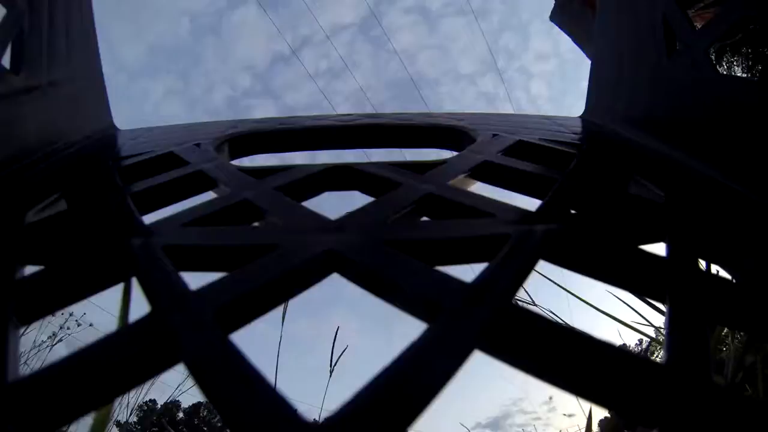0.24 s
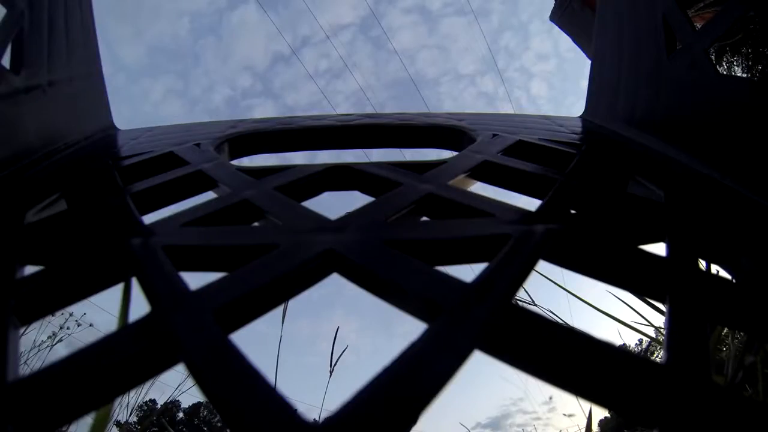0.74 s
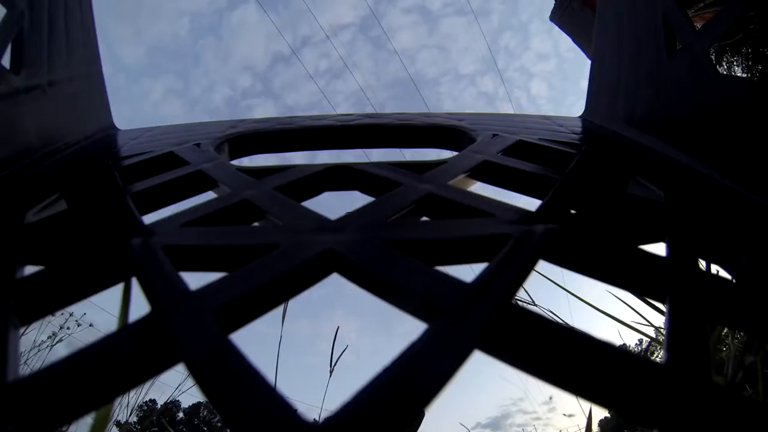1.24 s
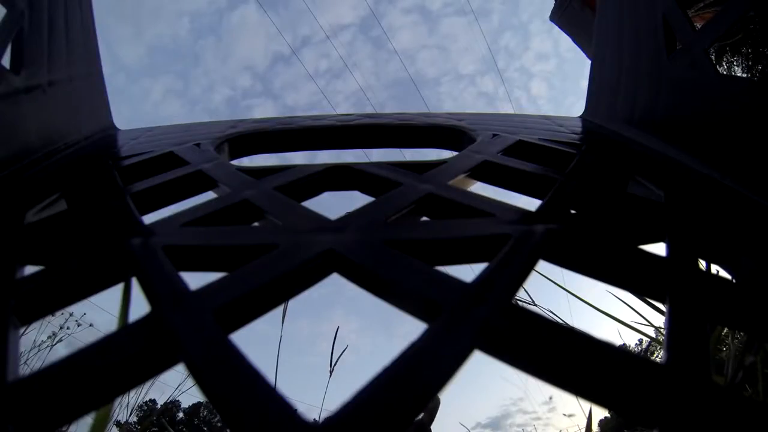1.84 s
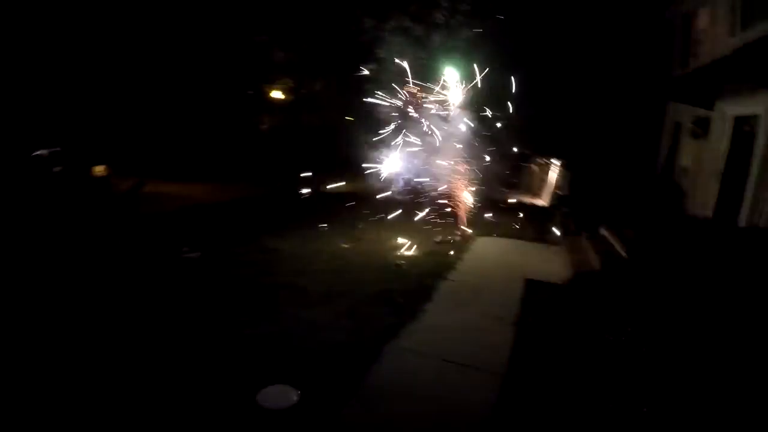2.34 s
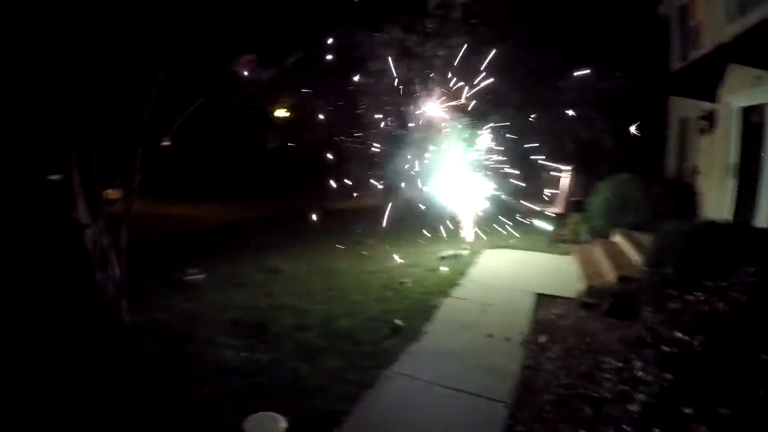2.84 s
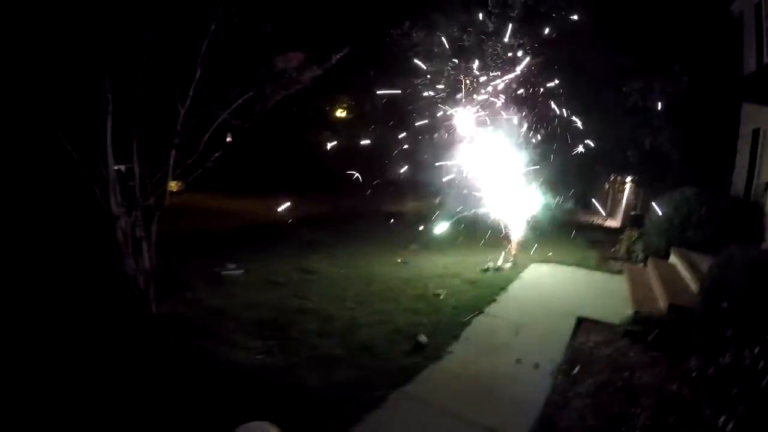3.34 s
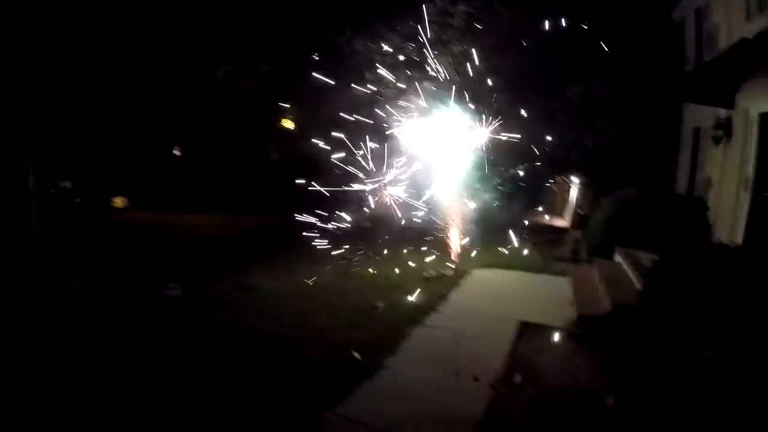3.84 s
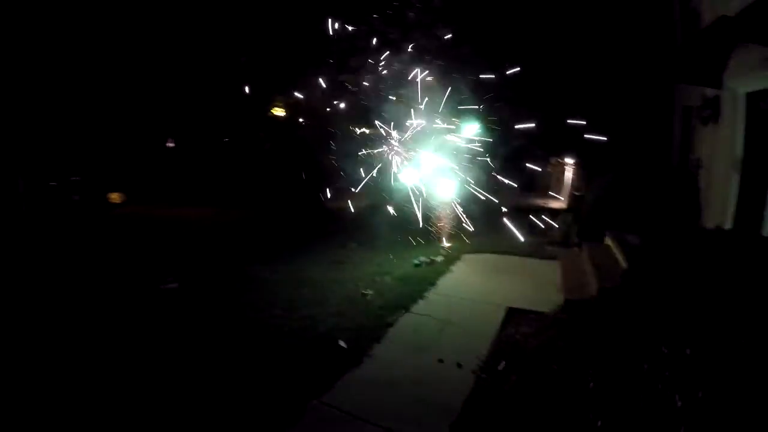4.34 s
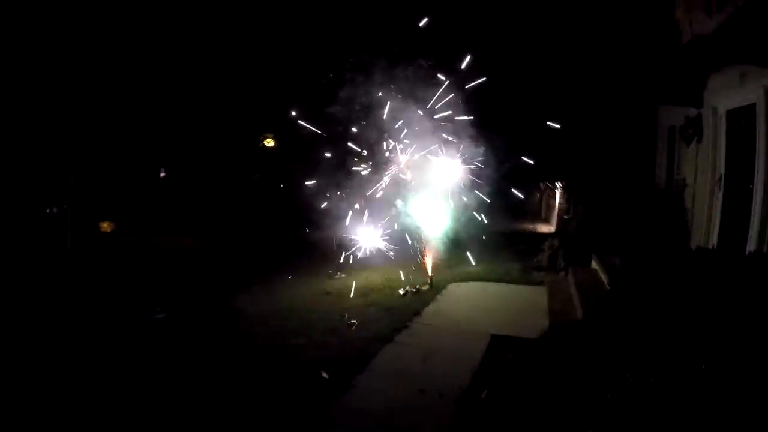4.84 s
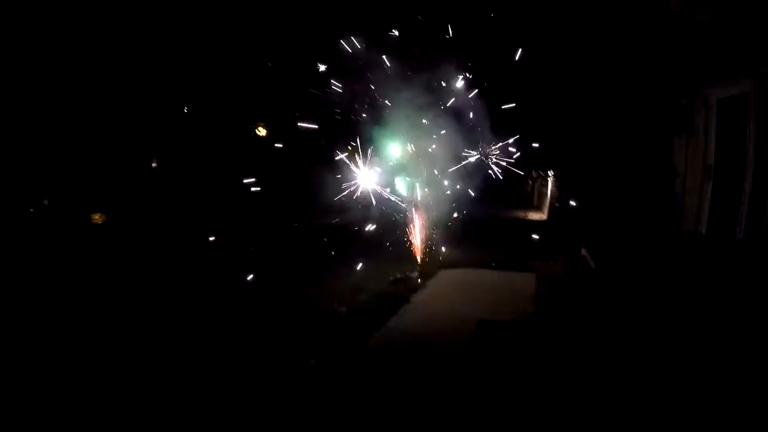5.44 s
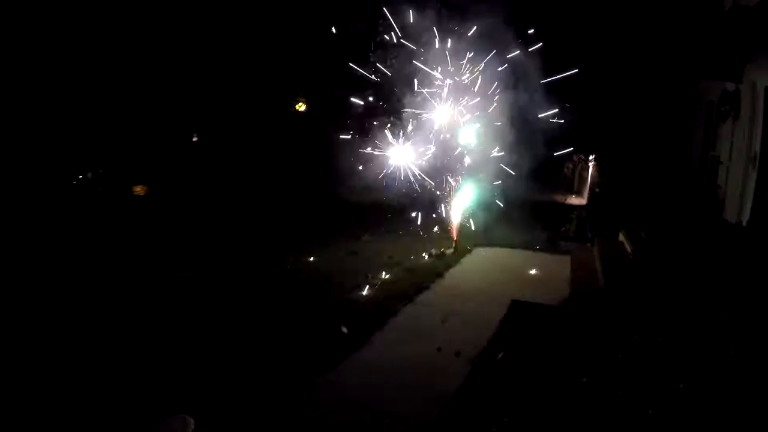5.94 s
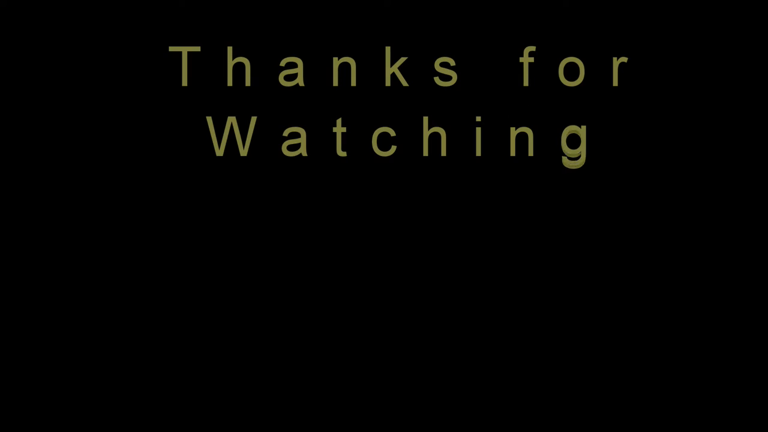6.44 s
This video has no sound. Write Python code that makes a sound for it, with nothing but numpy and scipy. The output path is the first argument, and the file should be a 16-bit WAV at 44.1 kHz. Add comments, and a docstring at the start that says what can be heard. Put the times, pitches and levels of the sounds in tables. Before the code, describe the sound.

Short indoor room tone, a hushed outdoor pause with one faint tick, then rapid sharp firework pops over gritty hiss, abruptly cut to silence.

```python
"""Ground fountain firework at night

A moment of garage air, then a hushed dusk outdoors, then a fountain on a lawn, cut short while still burning.
Room and dusk air are band-shaped noise; the dusk adds insect bands, a tick and a pulsing camera whine.
The stars are pressure spikes in quick clusters, reflected by the path and the house front, over a jet of
noise and sparks, all ringing in a small camera's housing. Low noise gives a breeze, the first bang's boom
and later puffs of air on the microphone.
"""
import sys
import numpy as np
from scipy import signal
from scipy.io import wavfile
from scipy.ndimage import uniform_filter1d

SR = 44100
rng = np.random.default_rng(int(sys.argv[2]) if len(sys.argv) > 2 else 0)


def transcribe(u):
    """Save the signal u as a 16-bit wav file named by the first command-line argument.

    u: samples, shape (n,) or (channels, n), limited to [-1, 1]; the rate is SR.
    q: integer samples, one column per channel.
    """
    v = np.clip(np.atleast_2d(u).T, -1, 1)
    q = np.round(v * 32767).astype(np.int16)
    wavfile.write(sys.argv[1], SR, q)


N = 294611
TIME = np.arange(N) / SR  # seconds

# The three successive places. Each: start in seconds, end in seconds.
GARAGE_SPAN = (0, .269)
DUSK_SPAN = (.288, 1.932)
NIGHT_SPAN = (1.981, 6.150)

# Spectrum of garage air. Each row: frequency in Hz, relative density in dB per Hz.
GARAGE_SPECTRUM = [(25, -1.5), (60, -9), (135, 2), (175, -19), (230, -3.5), (550, -12), (830, -4),
                   (1100, -12), (1400, -12.5), (2100, -18), (3400, -29.5), (10000, -36.5), (15000, -37)]
# Spectrum of dusk air. Each row: frequency in Hz, relative density in dB per Hz.
DUSK_SPECTRUM = [(15, -33), (25, 3.5), (71, 0), (139, -3.5), (243, -8), (729, -17.5), (790, -18),
                 (2300, -27), (2700, -26), (3930, -31.5), (5010, -31), (7480, -40), (12100, -42),
                 (13800, -40), (15000, -43)]
# Faint shrill bands, as of far insects. Each row: centre in Hz, width in Hz, rms level in dB.
INSECT_BANDS = [(2680, 450, -76), (4980, 250, -84)]
# Thin electronic camera whine. Each row: frequency in Hz, amplitude before pulsing in dB, rms wavering in Hz.
WHINE_TONES = [(5730, -85, 8), (11290, -81, 10)]
# Low swells: the first bang's boom, then puffs of air on the microphone.
# Each row: start in seconds, time from start to release in seconds, level in dB.
LOW_SWELLS = [(2.0, .05, -41), (4.235, .17, -33.5), (5.28, 0.073, -38.5), (5.64, .04, -34.5),
              (5.84, .08, -39)]
# Spectrum of the fountain's jet. Each row: frequency in Hz, relative density in dB per Hz.
JET_SPECTRUM = [(30, 1.5), (80, 3.5), (160, -12.5), (400, -1.5), (800, -17), (2000, -12), (5000, -9.5),
                (15000, -9)]
# Loud bursting stars. Each row: time in seconds, relative level in dB, crack over body in dB.
LOUD_STARS = [(1.993, 0, -5), (2.0435, -4, -4), (2.054, -14, -1), (2.073, -7.5, -6.5), (2.1209, -11, -3),
              (2.1376, -7.5, -7.5), (2.1915, -13, -1), (2.2098, -7, -4), (2.3041, -8, -4.5),
              (2.3293, -13, -5), (2.3855, -11, -2.5), (2.404, -13, -5.5), (2.4507, -6.5, -2.5),
              (2.5129, -13.5, -0.5), (2.5258, -7.5, -4), (2.5503, -8, -4), (2.596, -7, -1),
              (2.641, -9, -3.5), (2.661, -14.5, -1.5), (2.69, -13, 3), (2.7118, -18, -15.5),
              (2.7332, -6, -7), (2.758, -19, -10.5), (2.798, -16.5, -3), (2.818, -17.5, -13),
              (2.8356, -11.5, -5.5), (2.8441, -16, -6), (2.9033, -14, -4), (2.939, -6.5, -4),
              (2.975, -13.5, -7), (3.066, -14, -7), (3.071, -11.5, -5), (3.1059, -8, -6), (3.132, -7, -3.5),
              (3.1495, -13.5, -8.5), (3.1738, -14.5, -3.5), (3.1992, -12.5, -8), (3.2124, -11, -6),
              (3.2367, -8, -4), (3.2557, -11, -8), (3.2966, -12.5, -1), (3.3129, -12.5, -5.5),
              (3.323, -9, 0), (3.348, -16, -4), (3.376, -11, -8.5), (3.413, -6.5, -3.5),
              (3.4358, -11.5, -4), (3.4547, -11.5, -5), (3.555, -11.5, -3.5), (3.5868, -8.5, -7),
              (3.606, -7, -3.5), (3.623, -12, -1.5), (3.637, -12, -2), (3.657, -13.5, -4.5),
              (3.6652, -11, -4), (3.6829, -12.5, -4), (3.706, -11.5, -4.5), (3.7553, -9.5, -3),
              (3.8043, -11, -2), (3.8112, -11, -2), (3.854, -16, 0), (3.863, -10, -2), (3.8712, -6.5, -4.5),
              (3.9237, -9, -2.5), (3.979, -23, -10), (4.005, -7.5, -2.5), (4.069, -17.5, 1),
              (4.0807, -16.5, -12.5), (4.0983, -16, -1), (4.172, -9, -7.5), (4.2153, -7, -4),
              (4.2307, -7.5, -2), (4.268, -16, -6), (4.2885, -13.5, -6), (4.316, -10, -3), (4.336, -15, -3),
              (4.3467, -10.5, 0.5), (4.3786, -15.5, -8), (4.3961, -14.5, -10.5), (4.4574, -15, -1),
              (4.4753, -17.5, -4.5), (4.5225, -16, -5.5), (4.5622, -17, -2), (4.5734, -10, -3),
              (4.584, -8, -4.5), (4.6531, -17, -8), (4.6646, -11, -7), (4.7447, -11, -8), (4.7567, -8, 0),
              (4.7934, -12, -2), (4.822, -12, -7), (4.8346, -7, 0), (4.8688, -9, -0.5), (4.9295, -10, -6),
              (4.9361, -11, 0), (4.9675, -12, -2.5), (5.0054, -11, -1), (5.0252, -13, -9),
              (5.036, -14, 5.5), (5.0753, -18, 0), (5.1581, -10, -2.5), (5.1692, -9, 0.5),
              (5.2109, -9.5, -2), (5.246, -11.5, 0), (5.2692, -13.5, -3), (5.288, -16.5, -7),
              (5.322, -24.5, -8), (5.339, -13, -5.5), (5.3485, -13, -3), (5.3592, -8.5, 0.5),
              (5.4238, -8, -3), (5.5192, -14, -4.5), (5.5633, -16, -7), (5.5784, -9, -3),
              (5.6027, -11.5, -1), (5.629, -21, -3), (5.6676, -10, -8.5), (5.7077, -15.5, -3),
              (5.7538, -11, -1), (5.762, -8, 1), (5.8395, -8, -2), (5.8602, -10, .5), (5.8796, -13, -1.5),
              (5.893, -10.5, -3), (5.922, -6, -4), (5.9589, -6.5, -2), (6.0206, -7.5, -2.5),
              (6.0544, -8.5, -3.5), (6.1243, -21.5, -17)]
# Resonances and hollows of the camera housing. Each row: centre in Hz, width in Hz, gain in dB.
HOUSING_MODES = [(84, 14, 5.5), (118, 22, -3), (260, 97, 4.5), (440, 160, -3.5), (777, 557, 12.5),
                 (1244, 210, 5.5), (1650, 1300, -6), (2660, 2000, 4.5), (4180, 260, 4), (5000, 650, 3.5),
                 (5690, 520, 5), (7430, 2000, 4)]

GARAGE_DB, DUSK_DB = -41.5, -53.5  # rms of the air noise
FRAMES_PER_S = 30  # pictures the camera takes, which pulse its whine
SWELL_ATTACK_S, SWELL_RELEASE_S, BREEZE_DB = .02, .045, -51.5

# Loud stars closer than the gap form one volley, and a weaker star may go off between them
VOLLEY_GAP_S, WEAK_SHARE = .031, .65
# A weak star lies below the mean of its two neighbours
WEAK_DROP_DB = 7.5
# Crack over body of weak stars and stragglers; the spread applies to their level and their crack
WEAK_CRACK_DB, WEAK_SPREAD_DB = -3.5, 2
# Outside a volley a faint straggler may trail a star: chance, mean delay, level below the star
STRAGGLER_SHARE, STRAGGLER_S, STRAGGLER_DROP_DB = .3, .022, 9.5

# Star heights at the start of the night; the whole range climbs as the fountain burns on
LOWEST_STAR_M, HIGHEST_STAR_M, CLIMB_M_PER_S = 0.97, 2.05, .11
MIC_HEIGHT_M, DISTANCE_M, SOUND_M_PER_S = 1.5, 6, 343
# The boom follows a star's dull body and weakens as the fountain burns on
BOOM_DB_PER_CRACK_DB, BOOM_FADE_DB_PER_S = 0.5, 0.7
CUTOFF_HZ = 15350


def from_db(db):
    """The decibel law: level to amplitude gain."""
    return 10 ** (np.asarray(db) / 20)


def rms_one(x):
    """Normalization to unit mean power."""
    return x / np.sqrt(np.mean(x ** 2) + 1e-20)


def butter(x, hz, kind, order=2):
    """Causal filtering with a maximally flat (Butterworth) passband."""
    edges_hz = np.clip(hz, 10, .45 * SR)
    return signal.sosfilt(signal.butter(order, edges_hz, kind, fs=SR, output="sos"), x)


def during(span):
    """Gating: one inside a span, zero outside, with 64-sample ramps."""
    return uniform_filter1d(1.0 * ((TIME >= span[0]) & (TIME < span[1])), size=64)


def coloured_noise(spectrum):
    """Spectral shaping: third-octave bands of white noise weighted by a density curve; rms 1."""
    hz, level_db = np.transpose(spectrum)
    edges = 20 * 2 ** (np.arange(30) / 3)
    white = rng.standard_normal((2, N))
    out = 0
    for k, (low, high) in enumerate(zip(edges, edges[1:])):
        log_centre = np.log(low * high) / 2
        gain = from_db(np.interp(log_centre, np.log(hz), level_db))
        # neighbouring bands take independent noise
        out = out + gain * butter(white[k % 2], [low, high], "band")
    return rms_one(out)


def swell(start_s, rise_s, t60, size):
    """Reverberant build-up and exponential decay of power in a swarm of reflections; unit energy."""
    age = np.maximum(np.arange(size) / SR - start_s, 0)
    power = ((1 - np.exp(-age / rise_s)) * from_db(-60 * age / t60)) ** 2
    return power / (np.sum(power) + 1e-20)


def scatter(start_s, rise_s, t60, size):
    """Diffuse scattering: Gaussian noise under a reverberant power envelope."""
    return rng.standard_normal(size) * np.sqrt(swell(start_s, rise_s, t60, size))


def garage(bump_db, bump_hz, bump_t60):
    """Stationary room noise plus a soft low bump, a damped oscillation dying from the outset."""
    bump = from_db(bump_db - 60 * TIME / bump_t60) * np.cos(2 * np.pi * bump_hz * TIME)
    return from_db(GARAGE_DB) * coloured_noise(GARAGE_SPECTRUM) + bump


def far_insects():
    """Narrow-band noise: shrill bands, as of many distant insects."""
    out = 0
    for hz, width_hz, level_db in INSECT_BANDS:
        band = butter(rng.standard_normal(N), [hz - width_hz / 2, hz + width_hz / 2], "band")
        out = out + from_db(level_db) * rms_one(band)
    return out


def camera_whine():
    """Modulation: tones wavering in frequency, their amplitude pulsing with each picture the camera takes."""
    waver = rms_one(butter(rng.standard_normal(N), 60, "low"))
    tones = 0
    for hz, level_db, waver_hz in WHINE_TONES:
        phase = 2 * np.pi * np.cumsum(hz + waver_hz * waver) / SR
        tones = tones + from_db(level_db) * np.sin(phase)
    pulsing = 1 + np.tanh(2 * np.sin(2 * np.pi * FRAMES_PER_S * TIME))
    return tones * pulsing


def dusk(tick_db, tick_hz):
    """Superposition of far outdoor murmur, insects, camera whine and one faint band-limited tick."""
    insects = far_insects()
    whine = camera_whine()
    tap = scatter(.778, .002, .03, N)
    tick = from_db(tick_db) * butter(tap, [tick_hz - 200, tick_hz + 200], "band")
    return from_db(DUSK_DB) * coloured_noise(DUSK_SPECTRUM) + insects + whine + tick


def breeze_and_swells(low_hz, high_hz):
    """Enveloped low noise: a steady breeze, the first bang's boom and later puffs of air, powers adding."""
    strength = from_db(BREEZE_DB)
    for s, hold_s, level_db in LOW_SWELLS:
        rise = np.clip((TIME - s) / SWELL_ATTACK_S, 0, 1)
        fall = np.exp(-np.maximum(TIME - s - hold_s, 0) / SWELL_RELEASE_S)
        strength = np.hypot(strength, from_db(level_db) * rise * fall)
    return strength * rms_one(butter(rng.standard_normal(N), [low_hz, high_hz], "band"))


def sparks(per_s, spread_db):
    """Shot noise: random impulses of either sign and unequal size make a fine grit; rms 1."""
    excess_db = spread_db * np.minimum(rng.exponential(1, N), 3)
    sizes = from_db(excess_db) * rng.choice([-1, 1], N)
    return rms_one(sizes * (rng.random(N) < per_s / SR))


def yard(pops, wash_db, wash_t60, wash_low_hz, boom_db, boom_t60, boom_hz, air_hz, size=30000):
    """Diffuse reverberation: each burst leaves a thin wash from porch and shrubs, and a low boom."""
    s, level_db, crack_db = np.transpose(pops)
    body_db = level_db - BOOM_DB_PER_CRACK_DB * crack_db - BOOM_FADE_DB_PER_S * (s - NIGHT_SPAN[0])

    def tail(burst_db, shape):
        """Incoherent addition: the powers of all echoes sum."""
        power = np.bincount(np.round(s * SR).astype(int), from_db(burst_db) ** 2, N)
        return rng.standard_normal(N) * np.sqrt(np.abs(signal.fftconvolve(power, shape)[:N]))

    wash_tail = tail(level_db, swell(0.0061, 0.0017, wash_t60, size))
    wash = from_db(wash_db) * butter(wash_tail, wash_low_hz, "high", order=1)
    boom = from_db(boom_db) * tail(body_db, swell(.001, 0.0015, boom_t60, size))
    return butter(wash, air_hz, "low", order=1) + butter(boom, boom_hz, "low")


def shock(at_s, top_hz, size):
    """Impulsive radiation: a pressure spike whose front a low-pass rounds."""
    return butter(1e-18 + (np.arange(size) == int(at_s * SR)), top_hz, "low")


def bounce_lag(height_m):
    """Image-source geometry: seconds by which the path's reflection trails the direct sound."""
    reflected_m = np.hypot(DISTANCE_M, height_m + MIC_HEIGHT_M)
    direct_m = np.hypot(DISTANCE_M, height_m - MIC_HEIGHT_M)
    return abs(reflected_m - direct_m) / SOUND_M_PER_S


def snap(bounce_s, ground_db, edge_hz, near_db, near_low_hz, wall_db, wall_s, wall_spread_s, size=1400):
    """Early reflections: a shock, its path bounce, scatter from things close by and a house-front slap."""
    ground_luck, wall_luck, place, sharpness = rng.standard_normal(4)
    direct = butter(shock(0, 8500, size), 9000, "low")
    # some bounces arrive sharp, others dulled by the grass
    bounce = shock(bounce_s, edge_hz * np.exp(.15 * sharpness), size)
    ground = from_db(ground_db + 1.2 * ground_luck) * bounce
    near = from_db(near_db) * scatter(.0011, 0.00049, 0.017, size)
    slap = scatter(wall_s + wall_spread_s * place, .0005, 0.0062, size)
    wall = from_db(wall_db + 2 * wall_luck) * slap
    return direct + ground + butter(near + wall, near_low_hz, "high", order=1)


def bursts():
    """Clustered point process: loud stars with random weaker ones inside volleys and stragglers elsewhere."""
    s, level_db, _ = np.transpose(LOUD_STARS)
    gap = np.diff(s)
    luck, place = rng.random((len(gap), 2)).T
    louder_db, brighter_db = WEAK_SPREAD_DB * rng.standard_normal((len(gap), 2)).T
    in_volley = gap < VOLLEY_GAP_S
    delay_s = np.where(in_volley, gap / 2, STRAGGLER_S) * (.5 + place)
    between_db = (level_db[:-1] + level_db[1:]) / 2 - WEAK_DROP_DB
    weak_db = np.where(in_volley, between_db, level_db[:-1] - STRAGGLER_DROP_DB)
    weak = np.column_stack([s[:-1] + delay_s, weak_db + louder_db, WEAK_CRACK_DB + brighter_db])
    goes_off = luck < np.where(in_volley, WEAK_SHARE, STRAGGLER_SHARE)
    return np.vstack([LOUD_STARS, weak[goes_off]])


def stars(pops, split_hz, burst_db):
    """Superposition of bursts at random heights, each dividing its level between dull body and sharp crack."""
    body, crack = np.zeros((2, N))
    for s, level_db, bright_db in pops:
        height_m = LOWEST_STAR_M + (HIGHEST_STAR_M - LOWEST_STAR_M) * rng.random()
        height_m += CLIMB_M_PER_S * (s - NIGHT_SPAN[0])
        sound = snap(bounce_lag(height_m), ground_db=0.0, edge_hz=9000, near_db=2.0, near_low_hz=497,
                     wall_db=-4.5, wall_s=.0127, wall_spread_s=0.00099)
        start = round(s * SR)
        at = slice(start, start + len(sound))
        body[at] += from_db(level_db + burst_db - bright_db / 2) * sound
        crack[at] += from_db(level_db + burst_db + bright_db / 2) * sound
    dull = butter(body + 1e-18, split_hz, "low", order=1)
    sharp = butter(crack + 1e-18, split_hz, "high", order=1)
    return dull + sharp


def housing(x, top_hz, bottom_hz, port_hz, port_width_hz):
    """Resonance and phase dispersion: the case colours the sound, its port spreads each spike in time."""
    for hz, width_hz, level_db in HOUSING_MODES:
        # peaking filter: the gain at its centre is g squared
        g, w = from_db(level_db / 2), 2 * np.pi * hz / SR
        a = np.sin(w) * width_hz / (2 * hz)
        numerator = [1 + a * g, -2 * np.cos(w), 1 - a * g]
        denominator = [1 + a / g, -2 * np.cos(w), 1 - a / g]
        x = signal.lfilter(numerator, denominator, x)
    r = np.exp(-np.pi * port_width_hz / SR)
    allpass = [1, -2 * r * np.cos(2 * np.pi * port_hz / SR), r * r]
    x = signal.lfilter(allpass[::-1], allpass, x)
    return butter(butter(x, top_hz, "low", order=1), bottom_hz, "high")


def fountain(jet_db, grit_db):
    """Source and transmission: bursts, their echoes and the gritty jet pass through the camera's case."""
    pops = bursts()
    hiss = from_db(jet_db) * coloured_noise(JET_SPECTRUM)
    grit = from_db(grit_db) * sparks(per_s=1700, spread_db=2.0)
    echoes = yard(pops, wash_db=17.5, wash_t60=0.2, wash_low_hz=697,
                  boom_db=18.0, boom_t60=0.3, boom_hz=301.5, air_hz=12000)
    crackle = stars(pops, split_hz=1990, burst_db=18.0)
    return housing(crackle + echoes + hiss + grit, top_hz=5260, bottom_hz=55.8,
                   port_hz=3000, port_width_hz=1600)


def scene():
    """Succession in time: garage, dusk and night follow one another, each gated to its span."""
    indoors = during(GARAGE_SPAN) * garage(bump_db=-31, bump_hz=47.6, bump_t60=0.32)
    evening = during(DUSK_SPAN) * dusk(tick_db=-18, tick_hz=2700)
    rumble = breeze_and_swells(low_hz=18, high_hz=54)
    night = during(NIGHT_SPAN) * (rumble + fountain(jet_db=-41, grit_db=-40.0))
    return (indoors + evening + night)[None]


def record(dry):
    """Saturation and band limiting: overload rounds the loudest snaps, then a steep low-pass cuts the top."""
    ceiling = from_db(-1.9)
    rounded = dry / (1 + (dry / ceiling) ** 4) ** (1 / 4)
    return signal.sosfilt(signal.ellip(10, .2, 90, CUTOFF_HZ, fs=SR, output="sos"), rounded)


dry = scene()
out = record(dry)
transcribe(out)
```